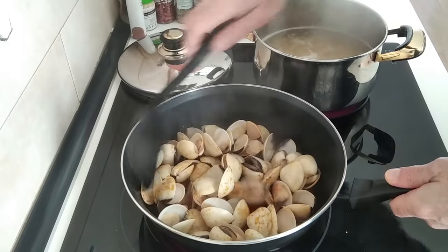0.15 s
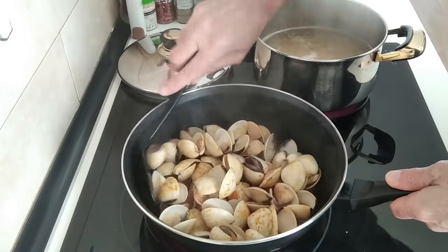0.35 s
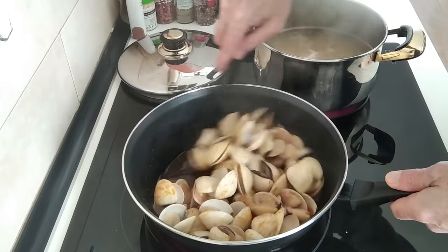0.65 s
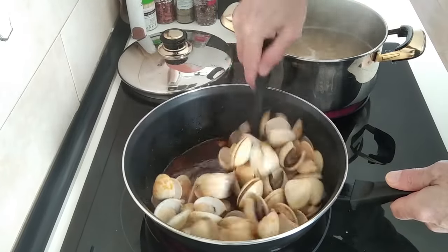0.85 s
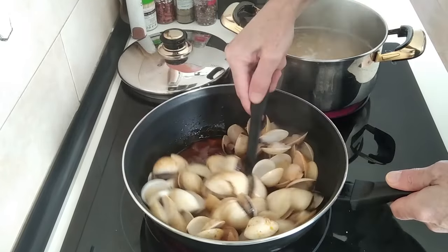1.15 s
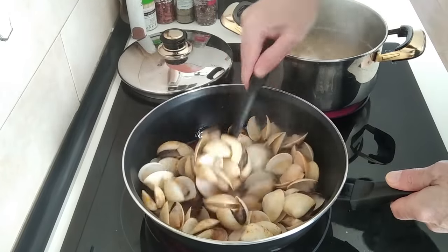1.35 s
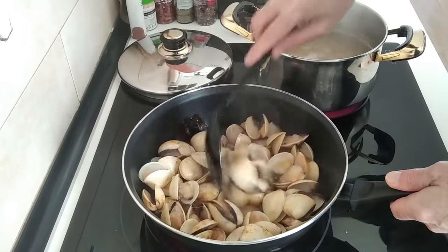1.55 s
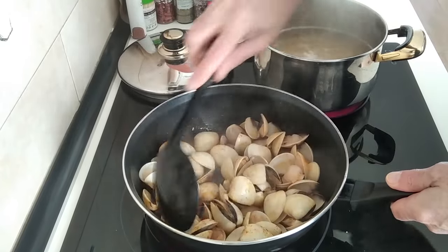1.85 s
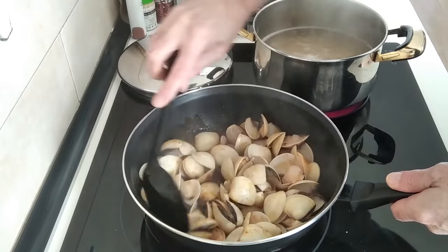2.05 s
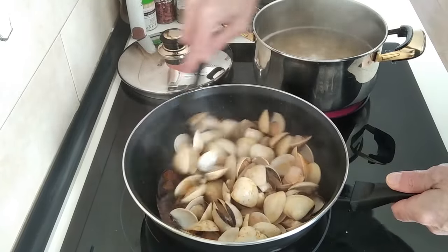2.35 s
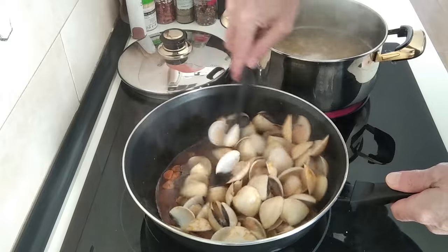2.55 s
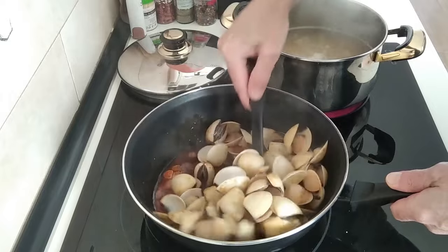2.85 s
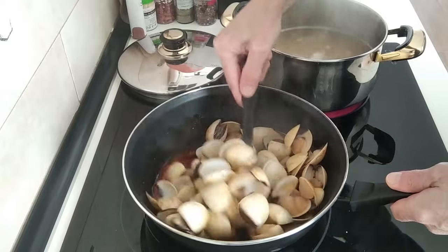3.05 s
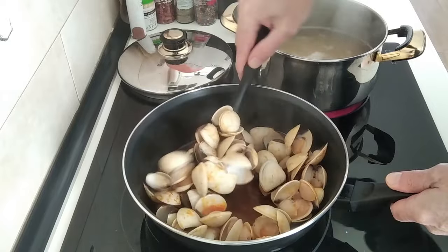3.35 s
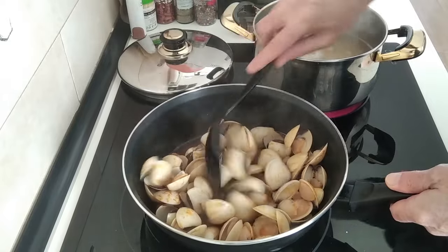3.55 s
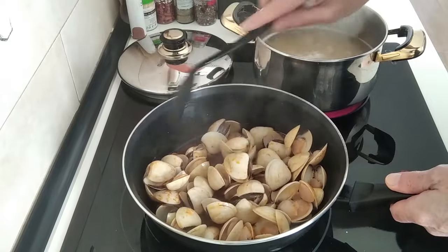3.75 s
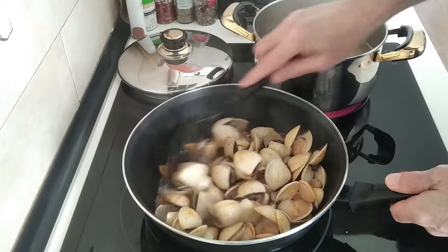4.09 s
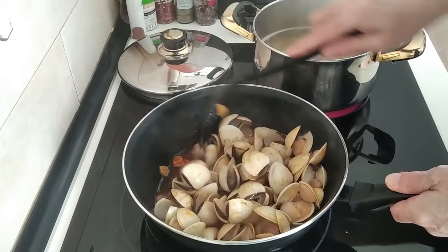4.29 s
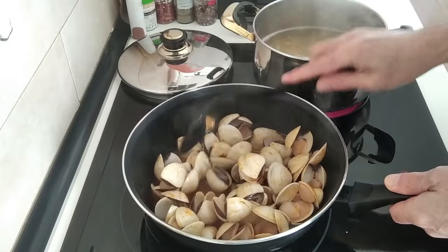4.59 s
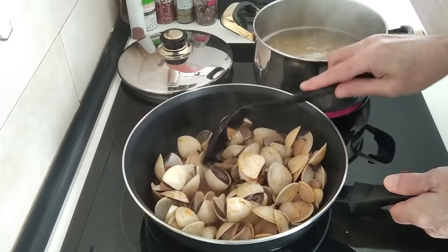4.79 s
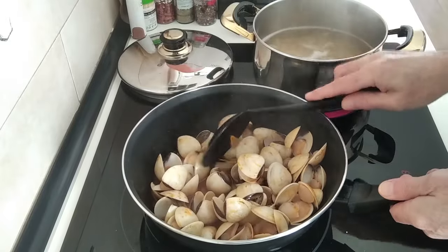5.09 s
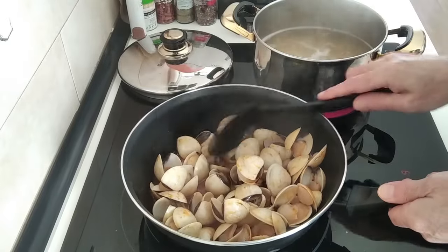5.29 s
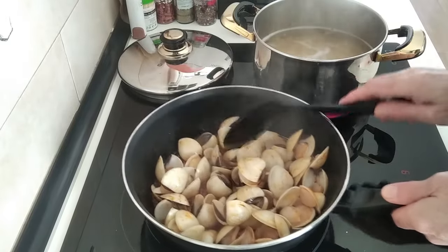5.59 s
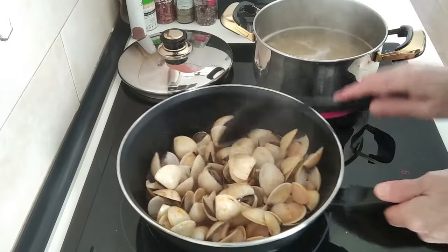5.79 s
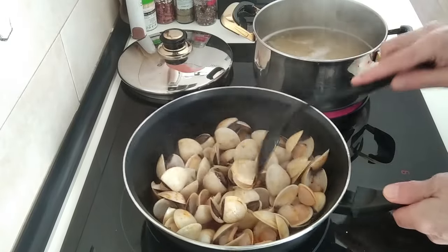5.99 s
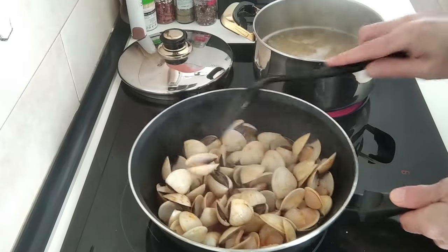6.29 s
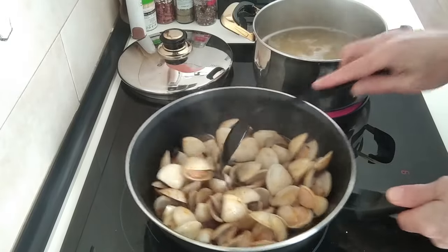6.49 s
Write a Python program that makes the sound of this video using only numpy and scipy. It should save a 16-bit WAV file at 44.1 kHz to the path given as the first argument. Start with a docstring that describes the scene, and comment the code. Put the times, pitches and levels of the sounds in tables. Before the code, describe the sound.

Hard little shells click, scrape and tumble over each other in a pan, heard close and in stereo. The stirring surges several times, brightest and loudest in the first half, then eases to scattered clacks. Near the end the spatula knocks the pan with hollow, quickly damped thuds, followed by a few last shell ticks. A soft, airy fan with a low hum runs throughout, and the tiled kitchen adds short reflections.

```python
"""Cooked clam shells are stirred in a frying pan with a plastic spatula, heard close by in a tiled kitchen.
From the start an extractor fan hums (shaped noise and a low tone) and small shells rattle (many tiny touches).
Soon single shells clack: bursts of gritty noise, shaped by the rings of the shell. Later short hollow tones
sound, mostly air popping under cupped shells (short rising tones), and the spatula knocks the pan (a set of
dying tones). Near echoes and a short room tail surround the shells and pan; two microphone ports colour left
and right."""
import sys
import numpy as np
from scipy import signal
from scipy.fft import rfft, irfft
from scipy.io import wavfile
from scipy.ndimage import uniform_filter1d

SR = 44100
rng = np.random.default_rng(int(sys.argv[2]) if len(sys.argv) > 2 else 0)


def output_pcm(signal):
    """Save a mono or channel-first signal as 16-bit PCM at the path in sys.argv[1].

    Samples are clipped to [-1, 1] before scaling.
    """
    pcm = np.clip(np.atleast_2d(signal).T, -1, 1) * 32767
    wavfile.write(sys.argv[1], SR, np.round(pcm).astype(np.int16))


N = 292452  # length of the sound in samples

# How alike left and right are at each pitch.
# Each row: frequency in Hz, likeness (1 the same, 0 unrelated, below 0 opposed).
LIKENESS = [(25, 0.87), (60, .97), (200, 0.99), (380, 0.82), (700, 0.77), (1300, 0.055), (2400, 0.071),
            (5000, -0.29), (15000, 0.41)]


def gain_of(db):
    """Turns decibels into a plain multiplier."""
    return 10 ** (np.asarray(db) / 20)


def evened(x):
    """Scales a signal to an average strength (rms) of 1."""
    return x / np.sqrt(np.mean(x ** 2) + 1e-20)


def read(points, hz):
    """Reads a table between its points, with frequency on a log axis as the ear hears it."""
    f, value = np.transpose(points)
    return np.interp(np.log(hz + 1), np.log(f + 1), value)


def add(mix, start_s, sound):
    """Mixes a sound in at a time in seconds, cut off at the end of the mix."""
    part = mix[:, round(start_s * SR):][:, :sound.shape[1]]
    part += sound[:, :part.shape[1]]


def causal(db):
    """Makes a filter from dB gains on 1025 bins that reacts as early as possible (minimum phase)."""
    log_gain = np.log(gain_of(np.maximum(db, -100)))
    circle = np.concatenate([log_gain, log_gain[-2:0:-1]])
    phase = -signal.hilbert(circle).imag
    return np.fft.ifft(np.exp(circle + 1j * phase)).real[:1024]


def ring(hz, t60, phase, size):
    """One tone of a struck body, falling by 60 dB in t60 seconds."""
    t = np.arange(size) / SR
    return gain_of(-60 * t / t60) * np.sin(2 * np.pi * hz * t + phase)


def fan():
    """Moving air is noise, coloured by duct resonances and drifting patches; the motor adds a low hum."""
    # Colour of the air noise. Each row: frequency in Hz, relative level in dB.
    air_colour = [(12, -29), (20, -3), (196, -8), (390, -6.5), (527, -10.5), (657, -7), (734, -11),
                  (889, -12.5), (1140, -15.5), (1240, -13.5), (1630, -17.5), (2030, -15.5), (3240, -21),
                  (5030, -17.5), (10000, -25.5), (14300, -37)]
    # Resonances of the duct. Each row: frequency in Hz, width in Hz, boost in dB.
    resonances = [(137, 39.5, 12), (289.2, 30.8, 12), (434, 89, 6), (671, 11.3, 12.5)]
    air_db, hum_hz, hum_db = -49, 37.8, -62  # both levels are rms
    frames, hz = N // 512 + 5, np.fft.rfftfreq(2048, 1 / SR)
    a, b, c, d, patches = rng.standard_normal((frames, 1025, 5)).T
    patches = uniform_filter1d(patches, 20, 0)  # smooth over pitch
    patches = evened(uniform_filter1d(patches, 8, 1))  # smooth over time

    # the right channel is part copy of the left, part noise of its own
    same = read(LIKENESS, hz)[:, None]
    left = a + 1j * b
    right = same * left + np.sqrt(1 - same ** 2) * (c + 1j * d)
    spectrum = np.array([left, right])
    duct_db = sum(db / (1 + (2 * (hz - f) / width) ** 2) for f, width, db in resonances)
    colour_db = read(air_colour, hz) + duct_db
    spectrum *= gain_of(colour_db[:, None] + 1.3 * patches)

    noise = signal.istft(spectrum, nperseg=2048, noverlap=1536)[1][:, :N]
    hum = np.sqrt(2) * np.sin(2 * np.pi * hum_hz * np.arange(N) / SR)
    return gain_of(air_db) * evened(noise) + gain_of(hum_db) * hum


def clack(db, rim_hz, cup_hz, cup_db, edge_db, ms, grit):
    """Rough edges grind for a moment; the damp shell answers with two broad, quickly dying rings."""
    # The broad bands of a contact: "cup", "rim" and "edge".
    # Each row in a band: frequency in Hz, relative level in dB.
    touch_bands = {"cup": [(150, -44), (500, 8.5), (1000, 4.5), (2000, 9), (3500, 11), (5500, -10)],
                   "rim": [(500, -92), (3000, -6.5), (4800, -1.5), (7000, 2), (9500, -2.5), (12000, -23)],
                   "edge": [(2000, -79), (8000, -5), (10500, 6.5), (12500, 0.5), (14500, -1)]}
    grit_even = 0.52  # how far the grinding is spread evenly over all pitches, 0-1
    hz = np.fft.rfftfreq(2048, 1 / SR)
    rim_ring = 8.2 / (1 + ((hz - rim_hz) / 750) ** 2)
    cup_ring = 10.5 / (1 + ((hz - cup_hz) / 280) ** 2)
    bands = [(read(touch_bands["rim"], hz) + rim_ring, 0),
             (read(touch_bands["cup"], hz) + cup_ring, cup_db),
             (read(touch_bands["edge"], hz), edge_db)]
    power = sum((gain_of(share_db) * evened(gain_of(band_db))) ** 2 for band_db, share_db in bands)

    u = np.arange(grit.shape[1]) * 1000 / SR / ms  # time counted in contact lengths
    touch = grit * 1.55 * u * np.exp(-2.5 * u)
    # the first touch is a clean blow, strongest in brief contacts
    touch[:, 8:11] += 0.48 * np.hanning(5)[1:-1] / np.sqrt(ms)
    spread = rfft(touch, 2048)
    touch = irfft(spread / (abs(spread) + 1e-9) ** grit_even)[:, :len(u)]

    shell = causal(10 * np.log10(power))[None, :512]
    sound = signal.fftconvolve(touch, shell, axes=1)
    loudest = uniform_filter1d((sound ** 2).mean(0), size=88).max()  # strongest 2 ms
    return gain_of(db - 2.0) * sound / np.sqrt(loudest)


def rattle():
    """Small shells shift under the spatula: many touches of 28 kinds of shell follow the stirring."""
    # Strength of the stirring. Each row: time in seconds, relative level in dB.
    stirring = [(0, -66), (.5, -56.5), (.7, -45), (.93, -41.5), (1.08, -45), (1.4, -53.5), (1.64, -43.5),
                (1.79, -56), (1.95, -87), (2.2, -51.5), (2.33, -57.5), (2.47, -51), (2.56, -51),
                (2.68, -44), (2.81, -43.5), (3.08, -53), (3.38, -50), (3.56, -57.5), (3.65, -39),
                (3.9, -69.5), (4.2, -43.5), (4.3, -61), (4.55, -56), (4.78, -71), (5.1, -63), (5.47, -67.5),
                (6.05, -70), (6.201, -73), (6.63, -64)]
    per_s, spread_db, kinds = 900, 4, 28  # touches a second, unevenness of their strength, kinds of shell
    cup_share_db = -2.5  # share of the cup band in the small touches
    s, db = np.transpose(stirring)
    t = np.arange(N) / SR
    strength = gain_of(spread_db * np.minimum(rng.exponential(1, N), 3.5))
    touches = evened(strength * (rng.random(N) < per_s / SR))
    touches *= gain_of(np.interp(t, s, db))

    kind_of_touch = rng.integers(0, kinds, N)
    bright, dull = np.zeros((2, N)), np.zeros((2, N))
    for kind in range(kinds):
        train = (touches * (kind_of_touch == kind))[None]
        grit = rng.standard_normal((2, 200))
        rim_hz, cup_hz, ms = rng.uniform(4040, 11600), rng.uniform(1060, 3870), rng.uniform(0.19, 0.83)
        rim = clack(0, rim_hz, cup_hz, -74, -21.0, ms, grit)  # hardly any cup
        cup = clack(0, rim_hz, cup_hz, 43, 0, ms, grit)  # nearly all cup
        bright += signal.oaconvolve(train, rim / np.linalg.norm(rim), axes=1)[:, :N]
        dull += signal.oaconvolve(train, cup / np.linalg.norm(cup), axes=1)[:, :N]
    return bright + gain_of(cup_share_db) * dull


def clacks():
    """Shell on shell, the contacts that stand out; each port hears the grinding partly on its own path."""
    # Each row: start in seconds, relative level in dB, rim ring in Hz, cup ring in Hz,
    # cup share in dB, contact length in ms, edge share in dB.
    contacts = [(0.221, -25.5, 6730, 1600, -4.5, 0.82, -13), (0.284, -31, 9300, 2350, -9, 3.2, -10),
                (0.361, -40.5, 5300.0, 1470, 2, 12, -7), (0.5729, -28.5, 9800, 3680, -0.5, 2.1, -13),
                (0.6768, -40, 6040.0, 3040.0, 5, 2.7, -14), (0.7082, -29.5, 8830.0, 4250, 2, 1.2, -12),
                (0.714, -40, 8800, 4300, -15, 3, -22), (0.753, -30.5, 5970, 4450.0, -9, 3.5, -12),
                (0.773, -24.5, 8240.0, 3900.0, -7.5, 2.2, -12.0), (0.78, -28, 5960, 3190.0, -13, 3.6, -12),
                (0.8097, -23.5, 5870, 4410.0, -17, 4.2, -25), (0.8335, -22.5, 8100, 4050, -5.5, 2.3, -22.0),
                (0.872, -25, 7800.0, 4480.0, -25, 4.2, -10), (0.8798, -25.5, 5430.0, 3400.0, -12, 3.1, -14),
                (0.893, -27.5, 8000.0, 4330.0, -2, 6, -6), (0.9134, -26, 6240.0, 2540.0, -11, 7.2, -13),
                (0.918, -27, 10000, 2670.0, -11.0, 2.6, -11),
                (0.9469, -23.0, 7100, 2970, -3.5, 1.65, -26.0),
                (0.982, -26, 6940, 3660.0, -8.0, 3.8, -20.0), (0.995, -29, 6000.0, 4260.0, -8, 6.3, -14),
                (1.02, -30, 6460.0, 3170.0, -10, 2.7, -10), (1.0362, -24, 5300.0, 3880.0, -10, 2.4, -9),
                (1.04, -26.5, 6480.0, 3770, -11, 2.8, -8), (1.106, -21.5, 6240.0, 4400.0, -10, 4.8, -14),
                (1.12, -24, 6050.0, 2240.0, -10, 5.5, -19), (1.157, -33, 5120.0, 3900.0, -2, 2.6, -17.0),
                (1.1784, -25, 7210.0, 4070, -15, 1.1, -7), (1.213, -31, 7200.0, 4360.0, -25, 3.2, -18.0),
                (1.2299, -32, 5950, 3730, -2, 4.9, -21), (1.2875, -33.5, 6590.0, 1760, 5, 3.4, -19.0),
                (1.296, -26.5, 5800, 3440, -9.5, 3.8, -7), (1.342, -34, 9000.0, 3170.0, -27, 3.0, -7),
                (1.413, -40, 8870.0, 2730.0, -1, 2.3, -10), (1.452, -38, 6000, 2500, 1, 5, -12),
                (1.46, -23, 5800.0, 2460, -5.5, 3.6, -12), (1.475, -30, 7840.0, 4300.0, -8, 4.7, -9),
                (1.495, -15, 6460, 3960, -4.5, 1.3, -16), (1.506, -28.5, 7900.0, 2280, 15, 5.7, -8),
                (1.5232, -11, 7350, 2680, -10.5, 2.2, -11.5), (1.532, -38, 7340.0, 3080.0, -5, 2.1, -17.0),
                (1.5708, -33.5, 7490.0, 3420.0, 2, 5.4, -14.0), (1.6183, -32, 7000, 3800, -17, 4.1, -6),
                (1.623, -21, 7900, 3540.0, -19, 8.5, -12), (1.6306, -15.5, 7060.0, 2340, -8, 4.8, -9),
                (1.647, -26, 7990.0, 3880.0, -5, 2.7, -14), (1.6547, -18, 7600.0, 4300.0, -16.5, 7.5, -15),
                (1.666, -24, 7360.0, 3900, -3, 1.7, -15.0), (1.73, -30, 4270, 4480.0, -10, 2.5, -12.0),
                (1.7645, -24.5, 6950, 4030.0, -31, 2.1, -13), (1.8677, -34, 7260, 2010, -7, 4.1, -29),
                (2.014, -49, 6350.0, 1900.0, 12, 1.1, -9.0), (2.1374, -36.5, 6700, 4560.0, 3, 4.7, -19.0),
                (2.164, -24.5, 8900, 3440, -12, 2.8, -19.0),
                (2.2383, -40.5, 6760.0, 4070.0, -9, 2.8, -18.0),
                (2.2723, -42.5, 7040.0, 1420.0, -22, 2.5, -21.0), (2.3212, -38, 8600, 4410.0, -5, 3.3, -8),
                (2.365, -37.5, 6000, 1520, 2.0, 4.9, -16.0), (2.3871, -39, 6180.0, 2220.0, 8, 2.5, -15.0),
                (2.419, -37, 9000.0, 2660.0, -1, 3.8, -22.0), (2.434, -43, 8500, 2600, 0, 6, -14),
                (2.444, -25, 8900, 4370, -5.5, 3.8, -27), (2.4684, -28.0, 7260.0, 2050.0, -2.5, 1.3, -22),
                (2.4752, -23.5, 7460, 3100, -6.5, 2.1, -18), (2.4885, -24.5, 8400, 2230, -10, 1.55, -19),
                (2.6, -39.5, 6750, 3270, -3, 9.2, -16), (2.623, -34.5, 6500.0, 3300.0, 2, 3.4, -17.0),
                (2.6431, -25, 5300, 4080, -1.5, 2.3, -7), (2.6618, -22, 5160, 2490, -8, 4.7, -6),
                (2.683, -30.5, 8010.0, 3320, 8, 2.5, -13.0), (2.6961, -18.5, 9800, 2300, -6.5, 0.97, -25),
                (2.7397, -30, 7840.0, 2680, -2, 4.8, -19.0), (2.765, -21.5, 5270, 4440.0, -15, 1.8, -10),
                (2.7893, -24.5, 8760.0, 3500.0, -3, 1.3, -2), (2.8006, -31, 5920.0, 2590, 12, 3.4, -14.0),
                (2.811, -18.5, 6800, 2900.0, -13, 1.8, -24.0), (2.887, -33.5, 7450.0, 2770, -5, 1.9, -23),
                (2.9366, -30.5, 9900, 2190, -9, 3.3, -22.0), (2.976, -32, 7200, 2780, -4, 1.5, -18),
                (2.993, -34, 5000.0, 4480.0, -19, 11, -7), (3.064, -39, 7320.0, 4200.0, -17, 2.7, -22),
                (3.1212, -41, 6160.0, 2980, 2, 2.2, -13), (3.1483, -21.5, 6600, 4370.0, -17, 4.3, -6.5),
                (3.219, -28.5, 7100, 3340, -14, 2.4, -22), (3.267, -33, 8340, 4440.0, -24, 2.4, -14),
                (3.288, -32, 7000, 3600, -9, 2.7, -14), (3.294, -25.5, 7650, 4350.0, -17, 3.6, -16),
                (3.322, -20, 4250, 3760, -8, 6.3, -23), (3.357, -27.5, 7400, 2110.0, -3, 2.3, -18.0),
                (3.4117, -32.5, 6000.0, 1520, -4.5, 7.4, -22), (3.4286, -23.5, 7640, 3280.0, -10, 3.2, -8),
                (3.445, -32, 7390.0, 3360, -1, 4.6, -19), (3.4758, -32.5, 7100.0, 3870, -8, 3.8, -18),
                (3.5601, -35.5, 6290.0, 3250.0, -2, 2, -22.0), (3.588, -28.5, 6400.0, 4480.0, -27, 1.5, -6),
                (3.596, -28.5, 9700.0, 3640.0, -6, 2.1, -21.0), (3.6056, -26.5, 5460, 1700.0, -1, 6.6, -7),
                (3.6248, -16, 7040.0, 4030, -14, 4.4, -9), (3.6383, -14.5, 7040.0, 2940, -14, 1.4, -6),
                (3.659, -25.5, 6460, 3570, -2.5, 3.1, -8), (3.674, -33, 7000, 2600, -3, 6.9, -14),
                (3.6858, -16.5, 6850.0, 2720, -5, 3.1, -13), (3.719, -25.5, 7860, 3360.0, -19.0, 2.8, -25),
                (3.735, -49, 9470.0, 3340.0, -3.0, 2.3, -19.0),
                (3.746, -26.5, 8900, 3100.0, -20, 3.7, -13.0), (3.841, -25.5, 3830, 2700, -12, 2.85, -11),
                (3.9598, -39.5, 8250, 3880.0, 0, 2, -18), (3.994, -33, 8250, 1650, 4.5, 2.8, -20),
                (4.0303, -24, 8650, 4180, -7.5, 2.2, -3), (4.071, -34, 8500, 4150, 0.5, 6.2, -21),
                (4.102, -29.5, 6660.0, 2500, -5, 2.4, -21), (4.131, -36, 4780.0, 2910.0, 2, 2.8, -17),
                (4.156, -29, 5900.0, 4100, -6.5, 2.9, -9), (4.1728, -22.5, 6100, 2900, -7, 1.1, -28.0),
                (4.185, -38, 8890.0, 2480.0, 1, 2.1, -16), (4.197, -36, 6030.0, 4480.0, -16, 11, -22.0),
                (4.2216, -31.5, 8500, 3950, -7, 5.1, -14.0), (4.2408, -34, 6910.0, 2470, -4, 4.6, -16.0),
                (4.3396, -31.5, 8700, 2500, -8, 0.89, -24.0), (4.3739, -34, 4500.0, 4330, 2.0, 1.7, -24.0),
                (4.4201, -38, 4690.0, 1020, 11, 2.6, -19), (4.445, -35.5, 7260.0, 1570, 0, 3.3, -27),
                (4.469, -32.5, 6170.0, 1730, 1.5, 3.4, -30), (4.5597, -33.5, 6370.0, 3750, 0, 2.5, -25),
                (4.5985, -22.5, 6650, 3400, -9, 1.2, -12), (4.644, -38, 7240, 4200, -10, 2.5, -8),
                (4.648, -22.5, 7240.0, 4220.0, -22, 1.7, -21), (4.662, -30.5, 6000.0, 3180.0, -6, 3, -9),
                (4.8035, -41.5, 5430.0, 1480, 9, 12, -17.0), (4.8248, -32, 8500, 3500, -12, 2.5, -12),
                (4.8287, -23, 9800, 4230, -5.5, 2.1, -16), (4.8502, -27.5, 5870, 4480.0, -13, 3.1, -12),
                (4.8922, -31.5, 6200.0, 2980.0, -13, 3.5, -16), (4.997, -31, 6140, 1460.0, -0.5, 6.5, -24),
                (5.0182, -33.5, 5000, 3730, -4, 5.6, -15.0), (5.088, -35.5, 7300.0, 3900, -5, 3.5, -14),
                (5.1553, -29, 6100, 1430, -3, 3.9, -24), (5.1789, -24, 5500, 1680, 1.5, 11, -11),
                (5.1892, -26.5, 5430.0, 1500, -3, 2.5, -20.0), (5.246, -33, 7240, 1680, -4, 2.5, -17.0),
                (5.3771, -22.5, 8350, 1490, -3, 4.8, -12), (5.418, -34.5, 5800, 4480.0, -27, 2.3, -10),
                (5.6716, -22.5, 8700, 1780, -11, 0.97, -8), (5.8371, -21.5, 5940, 2250, -10.5, 2.05, -6.5),
                (5.937, -41, 6060.0, 3040, 2, 3.3, -11), (6.13, -41.0, 8050.0, 1570.0, -7, 1.3, -7.0),
                (6.157, -39, 7150.0, 1650, 4.0, 4.4, -18.0), (6.1747, -27.5, 8260, 1780, -4.5, 2.4, -17),
                (6.2, -34.5, 5710.0, 3400, 4, 2.1, -16.0), (6.233, -32, 8040, 2560, 4, 1.7, -27.0),
                (6.2787, -27.5, 7300, 3520, -13, 3.4, -10), (6.4903, -33, 6340, 1780, -0.5, 5.3, -17.0),
                (6.514, -30.5, 5530.0, 2400, -3, 1.4, -12), (6.5229, -25, 6700, 4600, -4, 4.2, -13),
                (6.5488, -32.5, 4500.0, 2090, 3, 6.7, -14)]
    out = np.zeros((2, N))
    grit = rng.standard_normal((len(contacts), 3, 700))
    grit *= rng.random((len(contacts), 1, 700)) < .4  # separate tiny slips, not a smooth hiss
    for (start_s, db, rim_hz, cup_hz, cup_db, ms, edge_db), g in zip(contacts, grit):
        both_ports = g[:2] + 0.44 * g[2]  # own grit, and some that they share
        add(out, start_s, clack(db, rim_hz, cup_hz, cup_db, edge_db, ms, both_ports))
    return out


def pops():
    """Short hollow tones. Most are air pops under cupped shells: the pocket shrinks as sauce fills it, so each
    pop rises in pitch. A few are the hollow tock of a shell cup or a brief ring of the pan."""
    # Each row: start in seconds, relative level in dB, first pitch in Hz, climb in Hz, time to swell in ms.
    hollow_tones = [(.911, -38, 710, 45, 2.6), (1.107, -36.5, 630, 45, 1.6), (1.29, -33.5, 1670, 40, 1.4),
                    (1.469, -36.5, 650, 40, 1.8), (1.635, -36, 713, 50, 2.3), (2.7, -31, 1020, 30, 2.5),
                    (3.685, -28, 488, 270, 6.1), (3.709, -36, 653, 30, 4), (4.999, -32.5, 250, 45, 0.99),
                    (6.49, -42, 1150, 60, 2.8)]
    climb_s = 0.0162  # time the full climb takes
    out, t = np.zeros((2, N)), np.arange(4000) / SR
    for start_s, db, hz, climb_hz, ms in hollow_tones:
        pitch = hz + climb_hz * np.minimum(t / climb_s, 1)
        turns = np.cumsum(pitch) / SR
        u = t * 1000 / ms
        swell = u * np.exp(1 - u)  # rises to 1, then dies
        add(out, start_s, gain_of(db) * (swell * np.sin(2 * np.pi * turns))[None])
    return out


def knocks():
    """A blow rings the modes of the pan: heavy blows the lowest ones, hard blows the high ones."""
    # Each row: start in seconds, relative level in dB, bass weight in dB (modes below 100 Hz),
    # belly weight in dB (100 to 400 Hz), hardness in dB per octave above 500 Hz.
    blows = [(0.912, -38, -15, 7, -9), (1.108, -37, -16, 8, -15), (1.483, -35.5, -10, 10, -8),
             (1.495, -34.5, -3, 5, 12.5), (1.634, -42, -13, 10, 8.5), (2.012, -53, -6, -2, 12.5),
             (2.699, -32.5, -20, 5, 7), (2.801, -32.5, -18, 5, -8), (3.604, -31.5, -18, -3, 4.5),
             (3.631, -36, -9, 11.5, 12), (3.683, -40.5, 0, 15.5, -12), (4.376, -39, -2, 0, 7),
             (5.002, -41, 0, 9, 4), (5.188, -26, -16, 2.5, -26), (5.381, -19, -13, -3, -10),
             (5.671, -16, -8, -2.5, -10.5), (5.836, -19.5, -4.5, 1, -1.5), (5.854, -36, -6, 4, -5),
             (6.179, -32, -13, 1, -4.5), (6.49, -52.5, -17, 0, 17)]
    # Modes of the pan. Each row: frequency in Hz, relative level in dB, time to fall 60 dB in seconds.
    modes = [(64.5, -8, 0.74), (81.4, -7, 0.33), (127, -8, 0.18), (211, -4.5, 0.063), (329, 0.5, 0.037),
             (481.4, 2.5, 0.045), (706, -4, 0.052), (817, -3, 0.031), (1020, 5.5, 0.02),
             (1130, -10.5, 0.049), (1482, -2, 0.034), (1806, -7.5, 0.03), (2240, -6, 0.013),
             (895, -5, 0.038)]
    out, chance = np.zeros((2, N)), rng.standard_normal((len(blows), len(modes)))
    thuds, t = rng.standard_normal((len(blows), 400)), np.arange(12000) / SR
    slap_band = signal.butter(2, [200, 1300], "band", fs=SR)
    onset = 1 - np.exp(-t / 0.0017)
    for (start_s, db, bass_db, belly_db, hard_db), luck, thud in zip(blows, chance, thuds):
        body = np.zeros(len(t))
        for (hz, mode_db, t60), u in zip(modes, luck):
            level_db = mode_db + 0.39 * u  # each mode comes out a little different
            level_db += bass_db * (hz < 100) + belly_db * (100 < hz < 400)
            level_db += hard_db * np.log2(max(hz, 500) / 500)
            body += gain_of(level_db) * ring(hz, t60, u, len(t))
        body[:400] += 0.84 * signal.lfilter(*slap_band, thud) * np.hanning(400)  # wet slap of the blow
        add(out, start_s, gain_of(db - 7.5) * (body * onset)[None])
    return out


def kitchen(x):
    """A few near echoes, then sparse taps that die band by band; three tails take turns."""
    # Each row: frequency in Hz, time to fall 60 dB in seconds, relative tail level in dB.
    room = np.array([(100, 0.28, -15), (300, 0.27, -6), (780, 0.18, 5), (1780, 0.17, 0.5),
                     (4500, 0.2, -0.5), (7800, 0.18, -2), (10000, 0.17, -2.5), (13000, 0.22, -4.5)])
    # Pan wall, pot, tiles. Each row: delay in seconds, left level in dB, right level in dB.
    near_echoes = [(.0021, -17, -61), (.0036, -11.5, -7), (.0078, -14, -20)]
    turns_hz = 7.3  # how fast the tails take turns
    size, out = SR // 2, x.copy()
    for delay_s, left_db, right_db in near_echoes:
        add(out, delay_s, x * gain_of([[left_db], [right_db]]))

    turn = 2 * np.pi * turns_hz * np.arange(N) / SR
    for k in range(3):
        taps = np.zeros((2, size))
        # one tap at a random place in every 20 samples
        at = np.arange(160, size - 20, 20) + rng.integers(0, 20, (2, (size - 161) // 20))
        np.put_along_axis(taps, at, rng.choice([-1., 1.], at.shape), 1)
        hz, t, z = signal.stft(taps, SR, nperseg=256)
        alike = np.clip(read(LIKENESS, hz), 0, 1)[:, None]  # long waves reach both ports alike
        z[1] = alike * z[0] + np.sqrt(1 - alike ** 2) * z[1]

        build = 1 - np.exp(-t / 0.00038)  # the walls are farther than the pan: the tail swells first
        z *= build * gain_of(-60 * t / read(room[:, :2], hz)[:, None])
        energy = np.linalg.norm(signal.istft(z, SR, nperseg=256)[1][0])
        coloured = z * gain_of(read(room[:, ::2], hz))[:, None]
        tail = signal.istft(coloured, SR, nperseg=256)[1] / energy
        feed = x * np.sqrt(2 / 3) * np.cos(turn + k * np.pi / 3)
        out += signal.fftconvolve(feed, tail, axes=1)[:, :N]
    return out


def scene():
    """Shells and pan in the kitchen, over the fan."""
    # the deep pan holds back its own ring, and more so the pops, from the walls
    pan_share, air_share = gain_of([-2, -15.5])
    pan, air = knocks(), pops()
    roomy = kitchen(clacks() + rattle() + pan_share * pan + air_share * air)
    return roomy + (1 - pan_share) * pan + (1 - air_share) * air + fan()


def record(dry):
    """Each microphone port colours its channel; then the treble rolls off and the band ends."""
    # The two ports resonate at different pitches. Each row: frequency in Hz, left minus right in dB.
    port_contrast = [(60, -1), (300, -1.5), (1200, -0.5), (3300, -1), (5500, -4.5), (6800, -4), (8000, 6.5),
                     (9500, 13), (12000, 9.5), (14000, 7.5)]
    # Treble roll-off of the recorder. Each row: frequency in Hz, gain in dB.
    roll_off = [(14200, 0), (14600, -21), (16000, -38)]
    left_lag = 2  # samples by which the left hears later: the pan is nearer the right port
    edge_hz = 16489  # end of the band
    hz = np.fft.rfftfreq(2048, 1 / SR)
    ports = np.array([causal(read(roll_off, hz) + side * read(port_contrast, hz) / 2) for side in (1, -1)])
    ports[0] = np.roll(ports[0], left_lag)
    heard = signal.oaconvolve(dry, ports, axes=1)[:, :N]
    band_limit = signal.firwin(511, edge_hz, window=("kaiser", 9), fs=SR)
    return signal.oaconvolve(heard, band_limit[None], "same", axes=1)


dry = scene()
out = record(dry)
output_pcm(out)
```